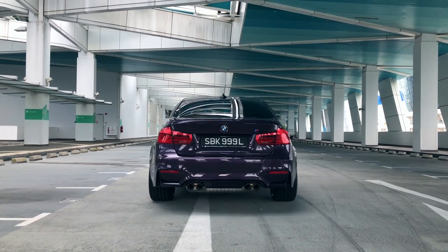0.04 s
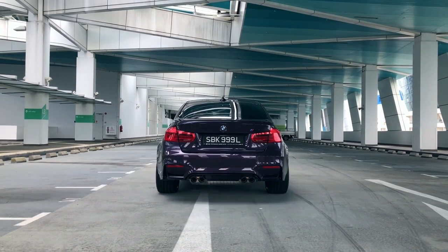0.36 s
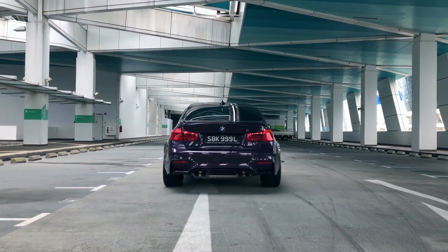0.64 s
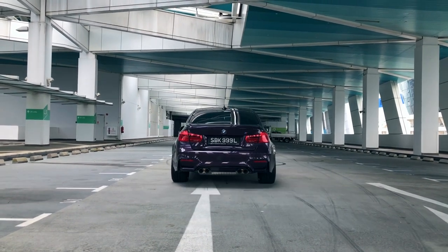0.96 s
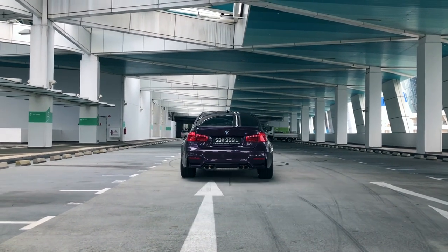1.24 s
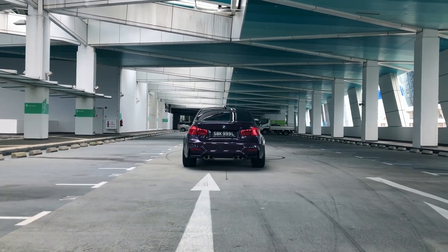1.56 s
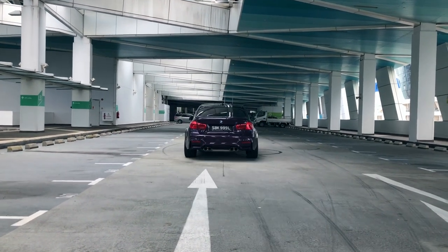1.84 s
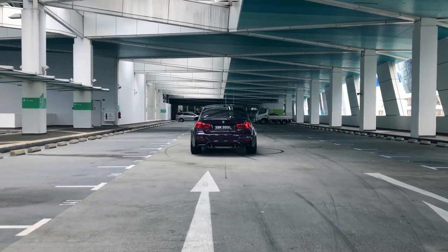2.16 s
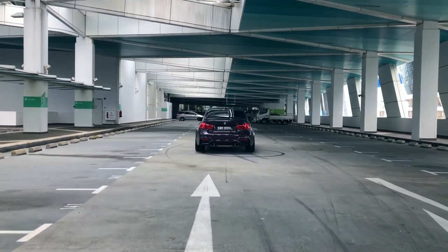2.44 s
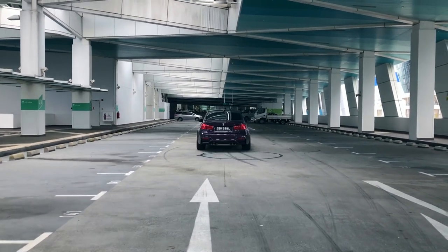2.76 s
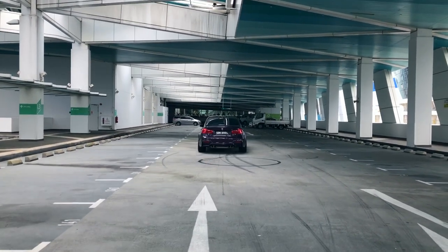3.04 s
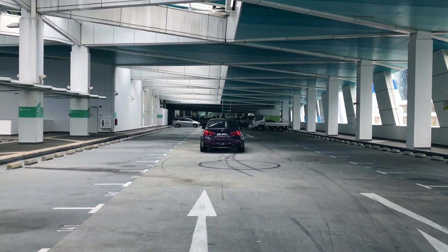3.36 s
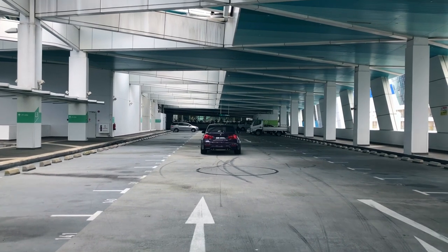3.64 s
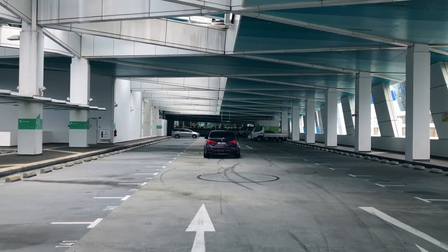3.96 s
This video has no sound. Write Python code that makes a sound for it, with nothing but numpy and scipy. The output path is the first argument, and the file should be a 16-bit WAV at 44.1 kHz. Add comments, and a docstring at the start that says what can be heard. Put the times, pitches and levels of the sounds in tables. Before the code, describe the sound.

A car pulls away in a concrete parking deck, its low exhaust drone rising steadily.

```python
"""A low exhaust drone comes first: a six-cylinder car pulls away in a concrete parking deck, revs rising.
Its firing pulses make harmonic tones that swell and fade as it moves between floor and ceiling.
Unequal cylinders add a lumpy burble, and puffs of escaping gas a rasp. A hollow roar of pipe resonances
and the noise of rolling tyres grow with speed, over the deck's air noise and a thin electrical buzz."""
import sys
import numpy as np
from scipy import signal
from scipy.fft import rfft, irfft
from scipy.io import wavfile
from scipy.ndimage import uniform_filter1d

SR = 44100
rng = np.random.default_rng(int(sys.argv[2]) if len(sys.argv) > 2 else 0)


def store_pcm(level_fs):
    """Save levels as 16-bit WAV."""
    pcm = np.round(np.clip(level_fs, -1, 1) * 32767).astype(np.int16)
    wavfile.write(sys.argv[1], SR, np.atleast_2d(pcm).T)


N = 176400
TIME_S = np.arange(N) / SR


# Exhaust harmonics, keyed by multiple of one cylinder bank's firing rate: time_s, relative_level_db
EXHAUST_HARMONICS = { 1: [(.6, -53), (1.3, -45), (1.6, -40), (2.6, -33.5), (2.9, -39), (3.07, -36.5),
                     (3.55, -39), (4, -50)], 2: [(.16, -16.5), (.5, -20.5), (.76, -21), (.9, -16.5),
                     (1.08, -19.5), (1.28, -22.5), (1.77, -21.5), (1.84, -34), (1.92, -29), (1.99, -30),
                     (2.09, -25.5), (2.19, -41.5), (2.27, -31), (2.37, -27.5), (2.5, -33), (2.59, -41),
                     (2.85, -28), (3.0, -23.5), (3.12, -21.5), (3.22, -26), (3.34, -18.5), (3.41, -19),
                     (3.46, -22.5), (3.53, -14.5), (3.6, -16), (3.7, -19), (3.765, -33), (3.82, -20.5),
                     (3.88, -18.5), (3.94, -24), (4, -18.5)], 3: [(0, -43), (.38, -36), (.75, -28),
                     (1.12, -27), (1.55, -28), (1.9, -26), (2.12, -30), (2.18, -44), (2.27, -31.5),
                     (2.85, -40.5), (3.3, -34), (4, -30)], 4: [(0, -20.5), (.62, -22), (.73, -23.5),
                     (.95, -18), (1.1, -20), (1.28, -23.5), (1.71, -23), (1.8, -31.5), (1.87, -23),
                     (1.99, -26.5), (2.09, -21.5), (2.19, -31.5), (2.26, -24), (2.34, -33), (2.42, -25),
                     (2.55, -34), (2.7, -32.5), (2.97, -41), (3.35, -30.5), (3.75, -30), (4, -34.5)],
                     5: [(0, -26.5), (.4, -35), (.65, -50), (.85, -29.5), (1.07, -26.5), (1.6, -33),
                     (2.1, -36.5), (3.1, -38.5), (3.5, -32.5), (3.85, -38), (4, -44)], 6: [(0, -27.5),
                     (.4, -30), (.65, -31), (.88, -34.5), (1.4, -34), (2.4, -34), (3, -53.5), (3.45, -43),
                     (4, -66)], 7: [(0, -41), (.5, -34.5), (.75, -52), (1.0, -36.5), (1.45, -36),
                     (2.15, -38), (2.5, -51), (3.2, -43), (3.72, -34), (4, -51)], 8: [(0, -31),
                     (.95, -29.5), (1.3, -35), (1.6, -52), (2.6, -47), (3.2, -44), (4, -52)], 9: [(.5, -57),
                     (.8, -38), (1.3, -41), (2, -40.5), (2.2, -47), (2.4, -39.5), (2.6, -44.5),
                     (2.9, -37.5), (3.2, -57), (3.8, -40.5)], 10: [(.5, -55), (.8, -43), (1.2, -41),
                     (1.5, -56)], 11: [(0, -44), (.9, -41.5), (1.5, -47.5), (1.8, -40.5), (2.2, -52)],
                     12: [(0, -43), (1.6, -49), (2.9, -54), (3.3, -46), (3.47, -33.5), (3.65, -36.5),
                     (3.85, -48)], 13: [(0, -41), (.65, -35), (1.1, -39.5), (1.5, -56)], 14: [(0, -50),
                     (2.7, -54), (2.87, -36), (3.02, -35.5), (3.2, -48)], 15: [(2.55, -58), (2.8, -41),
                     (3.1, -50)], }

def exhaust(turns, gain_db=0.5, shake_db=0.6, flutter_hz=16.7, dispersion_rad=1.2, dispersion_top=6.5):
    """Periodic firing makes harmonics; interference with echoes flutters the upper ones with distance."""
    out = np.zeros(N)
    flutter_depth = 0.076 * TIME_S  # grows as the car draws away
    for k, level in EXHAUST_HARMONICS.items():
        flutter = 1 + (k > 2) * flutter_depth * (drift(flutter_hz) + 1j * drift(flutter_hz))
        # Dispersion: the pipe delays higher harmonics more, up to a top multiple.
        lag = dispersion_rad * (k ** 2 - max(k - dispersion_top, 0) ** 2)
        tone = (flutter * np.exp(1j * (2 * np.pi * k * turns - lag))).real
        out += amp(curve(level) + shake_db * drift(rate_hz=15.5)) * unit_rms(tone)
    return amp(gain_db) * out


def pipe_harmonics(turns, rate_hz, response, count=96, cylinders=3, uneven_db=-4.5, spread_db=2.5):
    """Source and filter: a pipe shapes the engine cycle's harmonics, omitting the main exhaust tones."""
    out = np.zeros(N)
    for k, (phase, scatter) in enumerate(zip(rng.random(count), rng.standard_normal(count)), 1):
        multiple = k / cylinders
        if multiple not in EXHAUST_HARMONICS:
            # A bank's unequal cylinders put tones between its firing harmonics.
            source_db = (uneven_db if k % cylinders else 0) + spread_db * scatter
            pipe_db = spectrum_at(response, rate_hz[::100] * multiple)
            gain = np.repeat(amp(source_db + pipe_db), 100)[:N]
            out += gain * np.cos(2 * np.pi * (multiple * turns + phase))
    return unit_rms(out)


# Tailpipe resonances: frequency_hz, gain_db
PIPE_RESPONSE = [(50, -21), (100, -8), (170, -5.5), (280, -2.5), (360, -14), (460, -2.5), (570, -9.5),
                 (660, -2.5), (740, -12.5), (830, -11), (1100, -18), (1800, -30.5)]
# Burble envelope: time_s, level_db
BURBLE_ENVELOPE = [(0, -38), (.6, -39), (1.1, -39.5), (1.6, -38), (2.2, -37), (2.8, -37), (3.4, -36),
                   (4, -34.5)]

def burble(turns, rate_hz):
    """Pipe resonance colours closely spaced harmonics, which beat together as a lumpy burble."""
    tones = pipe_harmonics(turns, rate_hz, PIPE_RESPONSE)
    return amp(curve(BURBLE_ENVELOPE)) * unit_rms(reverberate(tones, wet_db=-1.5))


# Gas leaving the pipes: frequency_hz, relative_density_db
RASP_SPECTRUM = [(100, -3.5), (250, -1.5), (450, 5.5), (600, -9), (850, 0), (1300, -13), (2200, -18),
                 (3800, -13.5), (5500, -33), (8000, -27), (15000, -46.5)]
# Rasp envelope: time_s, level_db
RASP_ENVELOPE = [(0, -38.5), (1, -42.5), (2, -49.5), (3, -51.5), (4, -49)]

def rasp(turns, decay_firings=0.26):
    """Amplitude modulation: each firing of either bank releases a decaying puff of gas noise."""
    puffs = np.exp(-(2 * turns % 1) / decay_firings) * rng.standard_normal(N)
    return amp(curve(RASP_ENVELOPE)) * reverberate(coloured(puffs, RASP_SPECTRUM), wet_db=-2)


# Hollow pipe resonances under load: frequency_hz, gain_db
ROAR_RESPONSE = [(300, -15), (420, -15), (510, -26), (590, -2), (720, -2.5), (830, 6.5), (930, 3.5),
                 (1060, -4), (1180, -5.5), (1330, -3), (1600, -27.5), (2600, -25), (9000, -69)]
# Roar envelope before the treble is scaled: time_s, level_db
ROAR_ENVELOPE = [(0, -46), (1.5, -47), (2.3, -39), (2.7, -45), (2.9, -33.5), (3.2, -31), (3.6, -32.5),
                 (4, -35)]

def roar(turns, rate_hz, decay_firings=0.6, uneven_db=4.5, treble_hz=1050, neutral_rate_hz=66):
    """Forced resonance: harmonics and turbulent puffs ring the pipes, brighter as the revs rise."""
    firing = (2 * turns).astype(int)
    strength = amp(uneven_db * rng.standard_normal(N))[firing]
    puffs = strength * np.exp(-(2 * turns % 1) / decay_firings)
    howl = reverberate(pipe_harmonics(turns, rate_hz, ROAR_RESPONSE), wet_db=-6)
    gas = reverberate(coloured(puffs * rng.standard_normal(N), ROAR_RESPONSE), wet_db=-0.5)
    sound = unit_rms(howl + gas)
    treble = signal.sosfiltfilt(signal.butter(4, treble_hz, "high", fs=SR, output="sos"), sound)
    treble_gain = (rate_hz / neutral_rate_hz) ** 3
    return amp(curve(ROAR_ENVELOPE)) * (sound + treble * (treble_gain - 1))


# Tyres on concrete: frequency_hz, relative_density_db
TYRE_SPECTRUM = [(60, -13), (200, 2), (500, -1.5), (1000, -6.5), (1350, -7), (1650, -9.5), (2500, -17),
                 (4000, -20), (5500, -24), (7200, -26), (10000, -34.5), (15000, -49.5)]
# Rolling noise envelope: time_s, level_db
TYRE_ENVELOPE = [(0, -48), (1, -42), (2, -40.5), (2.5, -39), (3.2, -37.5), (4, -34.5)]

def tyres():
    """Rolling contact radiates broadband noise that grows as the car gathers speed."""
    return amp(curve(TYRE_ENVELOPE)) * patchy_noise(TYRE_SPECTRUM)


# Bursts of grit under the tyres: start_s, length_s, level_db
GRIT_BURSTS = [(2.373, .004, -49), (2.41, 0.11, -55), (2.89, .07, -61)]
# Crackle of grit: frequency_hz, relative_density_db
GRIT_SPECTRUM = [(2000, -12), (5000, 14), (9000, 7), (15500, -1)]

def grit():
    """Impulsive noise: grit crackles on the concrete in short, bright bursts."""
    crackle = coloured(rng.standard_normal(N) * rng.exponential(1, N), GRIT_SPECTRUM)
    return sum(amp(level_db) * crackle * np.sin(np.pi * np.clip((TIME_S - start_s) / length_s, 0, 1))
               for start_s, length_s, level_db in GRIT_BURSTS)


# Partials of the electrical buzz: pitch_hz, relative_level_db
BUZZ_PARTIALS = [(3553, -67.5), (3852, -66), (3912.5, -59), (3972.4, -68), (4032.2, -67), (4092.3, -62.5),
                 (4152.3, -66), (4552.3, -68), (4731.7, -69.5)]
# Envelope of the whole buzz: time_s, gain_db
BUZZ_ENVELOPE = [(0, -3), (.6, -1), (.9, -4), (1.3, 4), (1.55, -4), (2, -1), (2.08, 3.5), (2.18, -1),
                 (2.38, -6), (2.54, 3.5), (2.7, 0), (3.5, 0), (4, 3)]

def electrical_buzz(depth=0.26, waver_hz=1.5):
    """A line spectrum: thin high partials waver under slow amplitude and phase modulation."""
    out = np.zeros(N)
    for pitch_hz, level_db in BUZZ_PARTIALS:
        swell = 1 + depth * drift(waver_hz)
        phase = 2 * np.pi * (pitch_hz * TIME_S + rng.random()) + depth * drift(waver_hz)
        out += amp(level_db) * unit_rms(swell * np.sin(phase))
    return amp(curve(BUZZ_ENVELOPE)) * out


# Air noise of the deck: frequency_hz, relative_density_db
AIR_SPECTRUM = [(20, -29), (45, -3), (100, 3), (300, -10), (700, -15.5), (1500, -19), (2500, -24.5),
                (3900, -26.5), (5200, -32), (8000, -42.5), (11000, -43), (15500, -46.5)]

def air(level_db=-37.5):
    """The ambient noise floor: a continuous spectrum, strongest in the bass."""
    return amp(level_db) * patchy_noise(AIR_SPECTRUM)


# Reverberation time of the concrete deck: frequency_hz, t60_s
DECK_DECAY = [(60, 1.9), (250, 3.1), (1000, 1.12), (4000, 0.49), (12000, 0.25)]

def reverberate(x, wet_db):
    """Reverberation: dense reflections decay exponentially, treble first; power stays about the same."""
    hz, age_s, bins = signal.stft(rng.standard_normal(SR), SR, nperseg=512)
    decay = amp(-60 * age_s / spectrum_at(DECK_DECAY, hz)[:, None])
    tail = signal.istft(bins * decay, SR, nperseg=512)[1]
    with_lead_in = np.r_[x[SR:0:-1], x]  # the deck is already ringing at the start
    echoes = signal.fftconvolve(with_lead_in, tail / np.linalg.norm(tail))[SR:SR + N]
    return (x + amp(wet_db) * echoes) / np.sqrt(1 + amp(wet_db) ** 2)


def patchy_noise(spectrum, patch_db=1.5):
    """Random modulation: faint patches in time and frequency ripple a coloured noise."""
    bins = signal.stft(rng.standard_normal(N), SR, nperseg=1024)[2]
    patches = uniform_filter1d(rng.standard_normal(bins.shape), size=12, axis=0)
    patches = unit_rms(uniform_filter1d(patches, size=6, axis=1))
    noise = signal.istft(bins * amp(patch_db * patches), SR, nperseg=1024)[1][:N]
    return coloured(noise, spectrum)


def drift(rate_hz):
    """Low-passed noise: slow random motion of rms 1."""
    steps = N // 100
    hz = np.fft.rfftfreq(steps, 100 / SR)
    slow = irfft(rfft(rng.standard_normal(steps)) / (1 + (hz / rate_hz) ** 4), steps)
    return unit_rms(np.interp(np.linspace(0, steps - 1, N), np.arange(steps), slow))


def coloured(x, spectrum):
    """Linear filtering: shapes x by a spectrum, at rms 1."""
    gain = amp(spectrum_at(spectrum, np.fft.rfftfreq(N, 1 / SR)))
    return unit_rms(irfft(rfft(x) * gain, N))


def spectrum_at(points, hz):
    """Interpolation on a log-frequency axis."""
    frequency_hz, value = np.transpose(points)
    return np.interp(np.log(hz + 1), np.log(frequency_hz), value)


def curve(points):
    """Linear interpolation in time, one value per sample."""
    return np.interp(TIME_S, *np.transpose(points))


def unit_rms(x):
    """Normalisation to rms 1."""
    return x / np.sqrt(np.mean(x ** 2) + 1e-20)


def amp(db):
    """Decibels to amplitude ratio."""
    return 10 ** (np.asarray(db) / 20)


# Nominal firing rate of one three-cylinder bank: time_s, rate_hz
BANK_FIRING_RATE = [(0.0, 34.1), (0.3, 33.75), (0.5, 34.0), (0.75, 35.75), (0.99, 37.2), (1.25, 37.85),
                    (1.51, 41.1), (1.8, 44.1), (2.26, 49.15), (2.48, 51.45), (2.76, 54.55), (3.33, 65.1),
                    (3.68, 71.5), (4.0, 77.3)]

def scene(wander=0.0021):
    """Superposition: four exhaust layers share one engine speed, over the tyres and the background."""
    rate_hz = curve(BANK_FIRING_RATE) * (1 + wander * drift(rate_hz=15.5))
    turns = np.cumsum(rate_hz) / SR  # phase: one turn per firing of one bank
    engine = exhaust(turns) + burble(turns, rate_hz) + rasp(turns) + roar(turns, rate_hz)
    return (engine + tyres() + grit() + electrical_buzz() + air())[None]


def record(dry, cutoff_hz=15750):
    """Band limiting: a steep low-pass filter removes the highest treble."""
    lowpass = signal.firwin(511, cutoff_hz, window=("kaiser", 9), fs=SR)
    return signal.oaconvolve(dry, lowpass[None], "same")


dry = scene()
out = record(dry)
store_pcm(out)
```